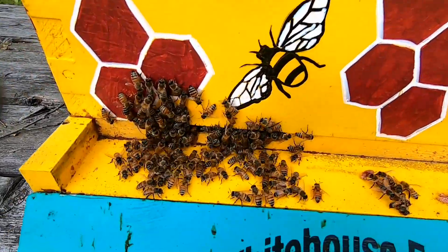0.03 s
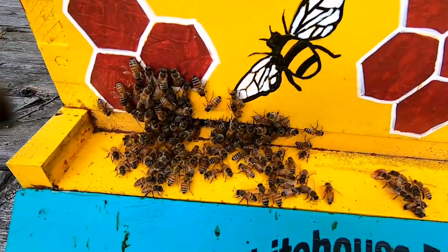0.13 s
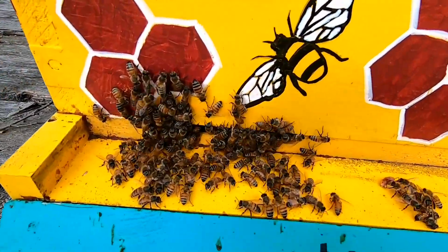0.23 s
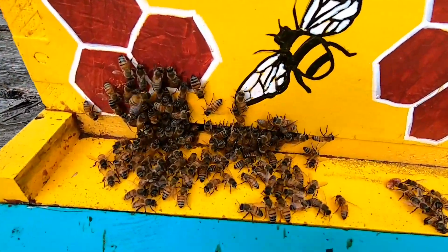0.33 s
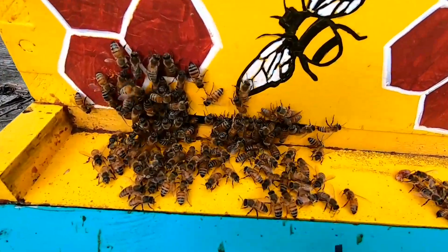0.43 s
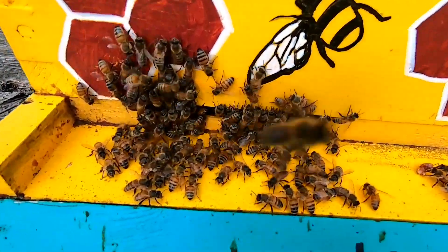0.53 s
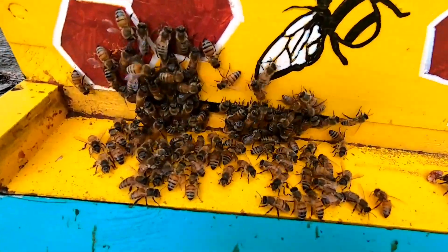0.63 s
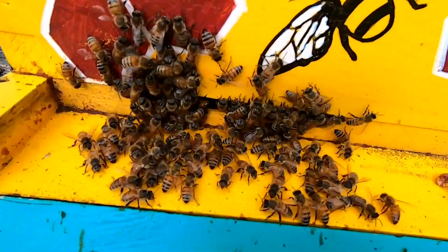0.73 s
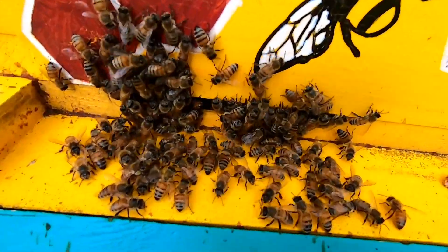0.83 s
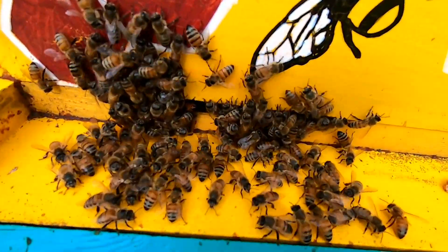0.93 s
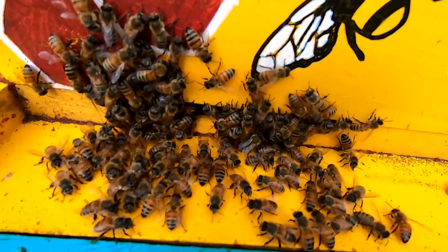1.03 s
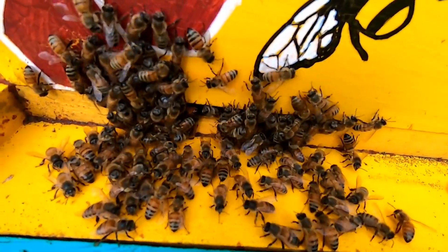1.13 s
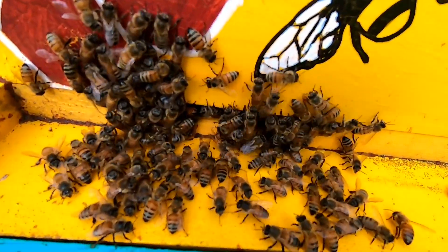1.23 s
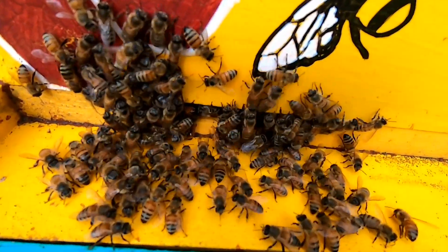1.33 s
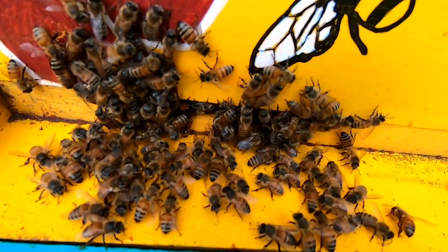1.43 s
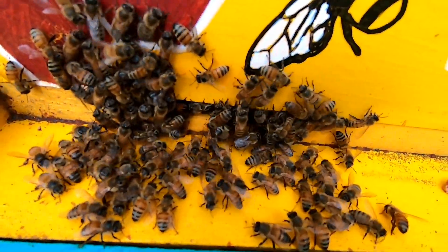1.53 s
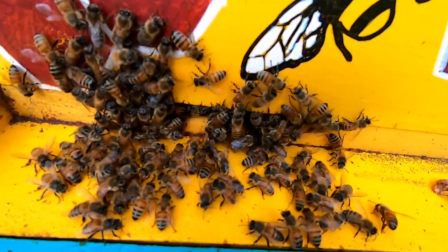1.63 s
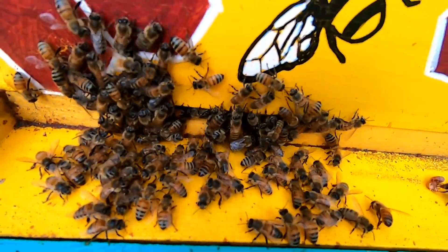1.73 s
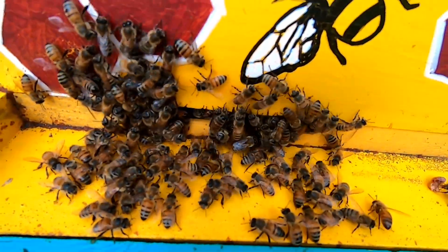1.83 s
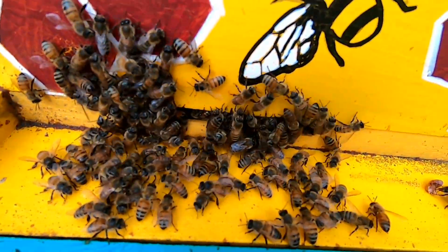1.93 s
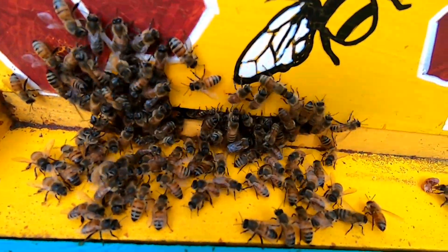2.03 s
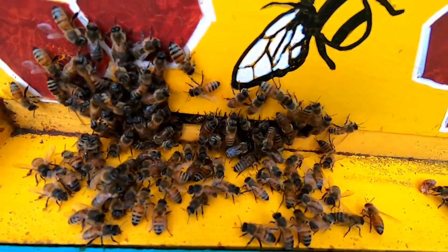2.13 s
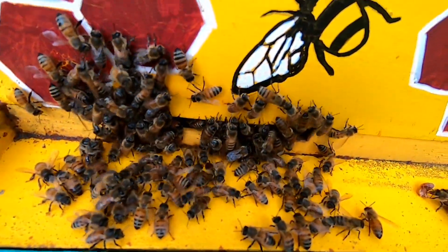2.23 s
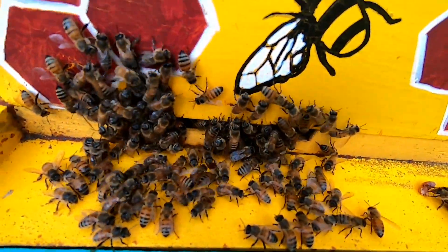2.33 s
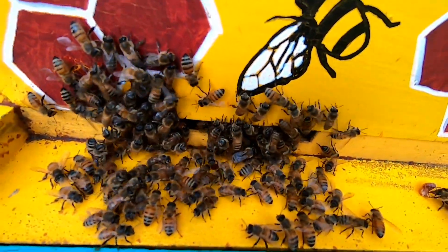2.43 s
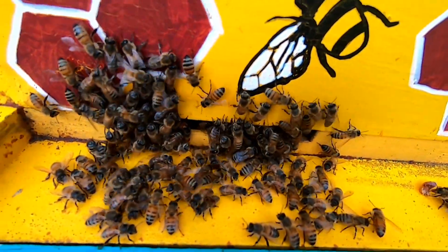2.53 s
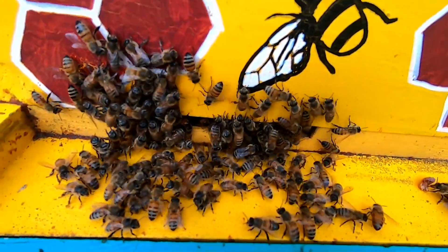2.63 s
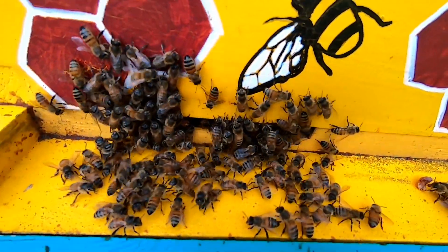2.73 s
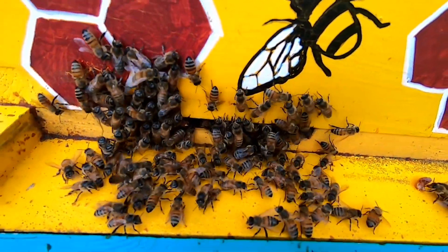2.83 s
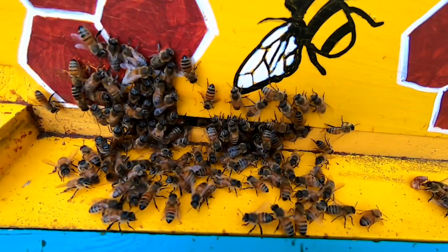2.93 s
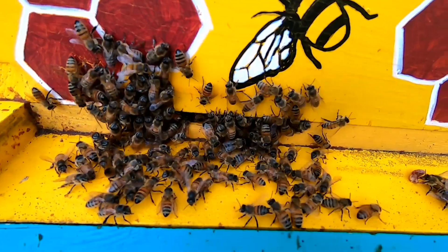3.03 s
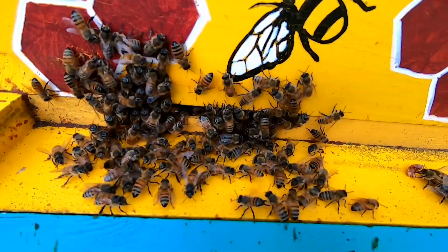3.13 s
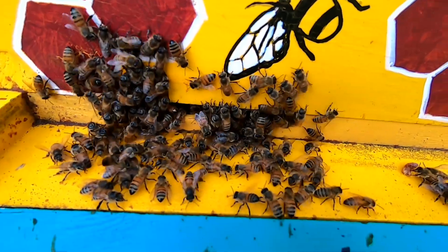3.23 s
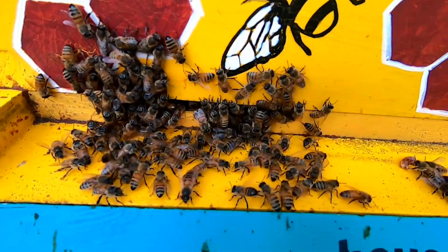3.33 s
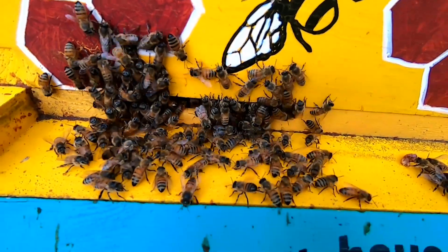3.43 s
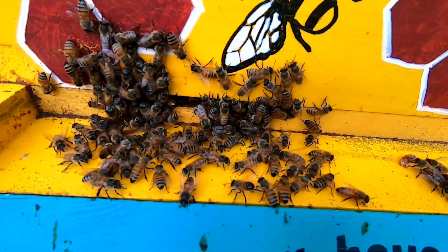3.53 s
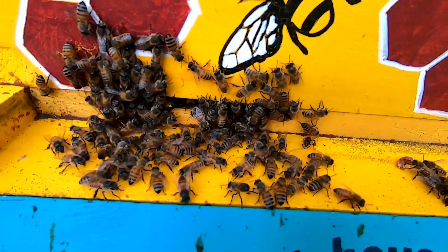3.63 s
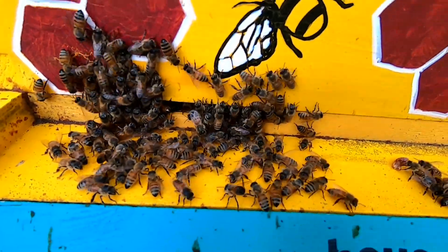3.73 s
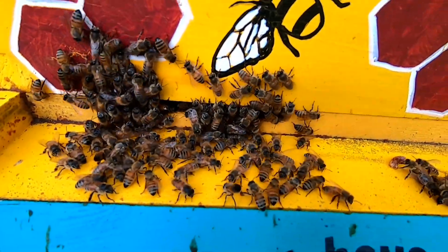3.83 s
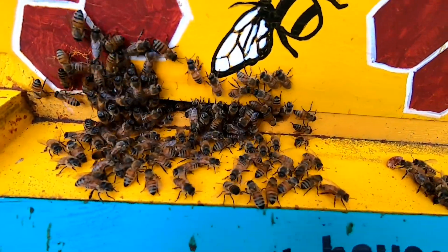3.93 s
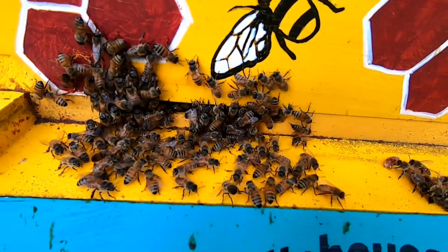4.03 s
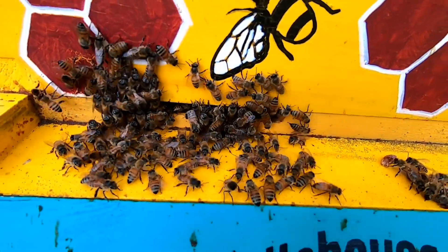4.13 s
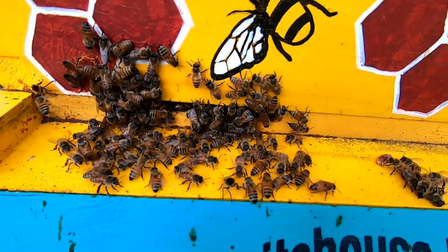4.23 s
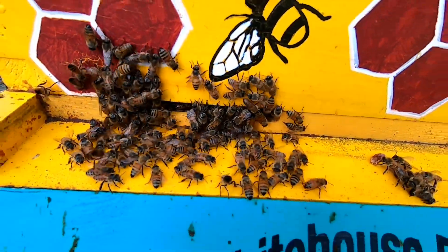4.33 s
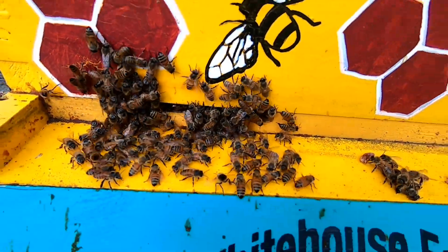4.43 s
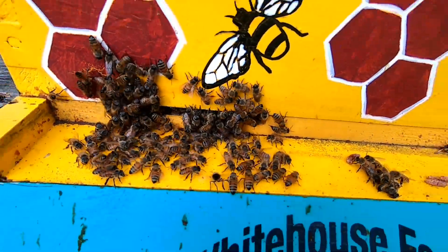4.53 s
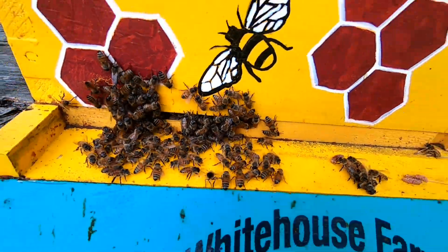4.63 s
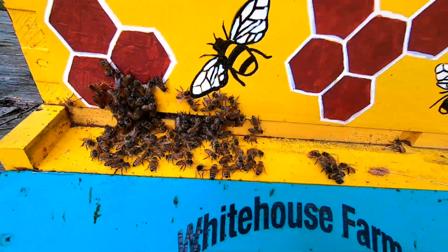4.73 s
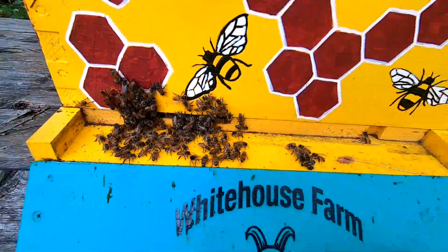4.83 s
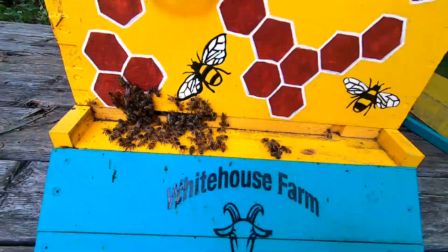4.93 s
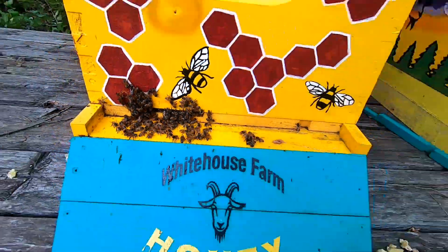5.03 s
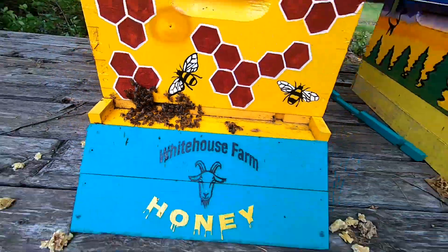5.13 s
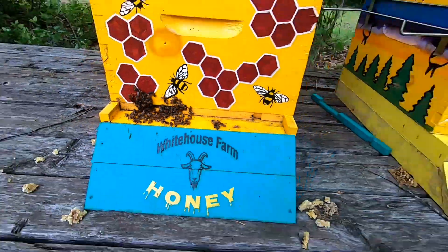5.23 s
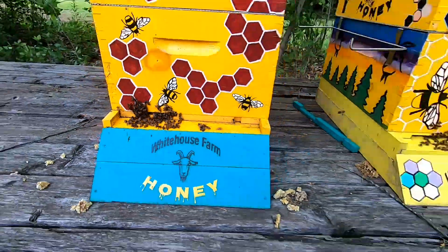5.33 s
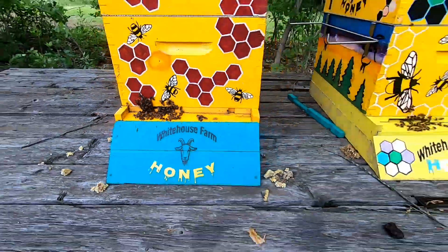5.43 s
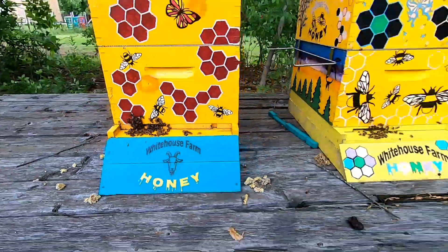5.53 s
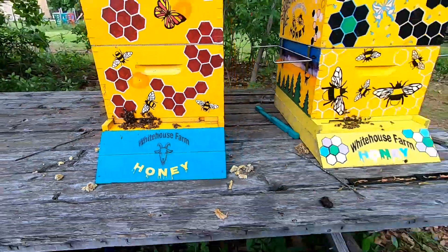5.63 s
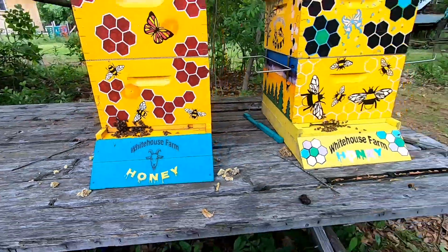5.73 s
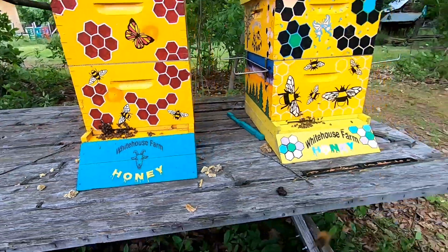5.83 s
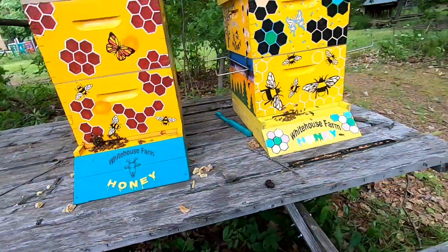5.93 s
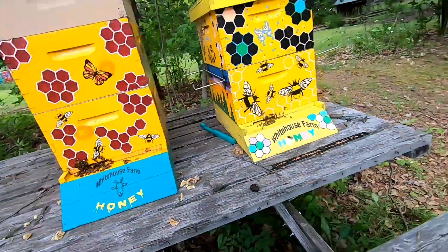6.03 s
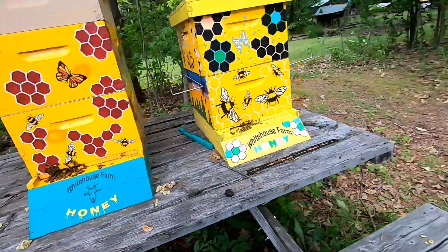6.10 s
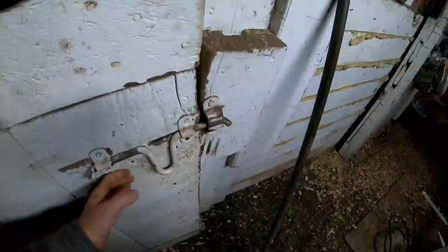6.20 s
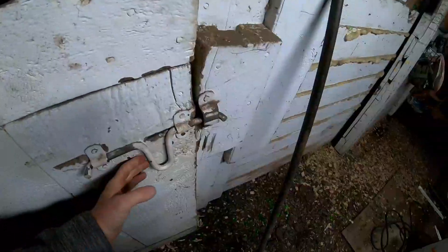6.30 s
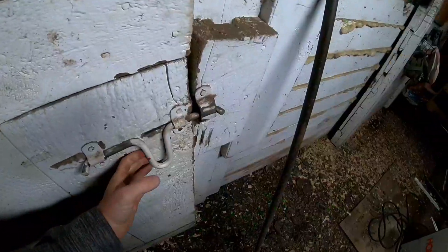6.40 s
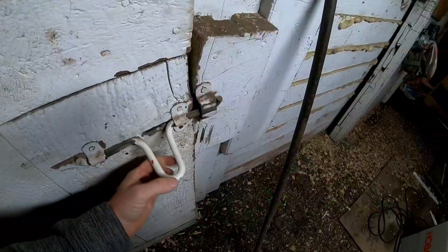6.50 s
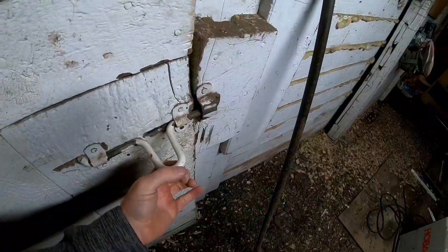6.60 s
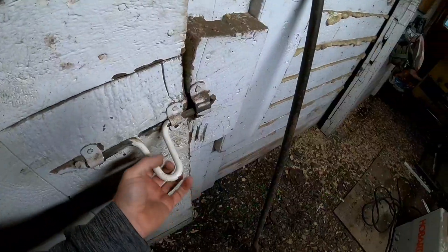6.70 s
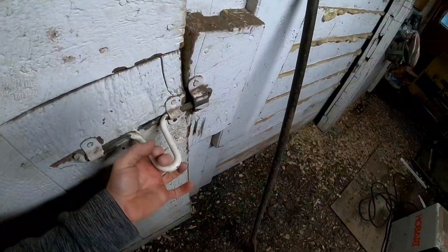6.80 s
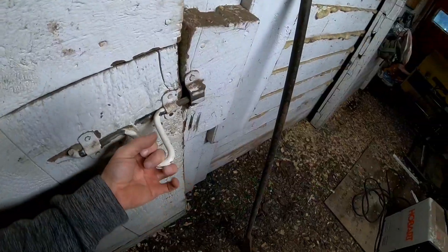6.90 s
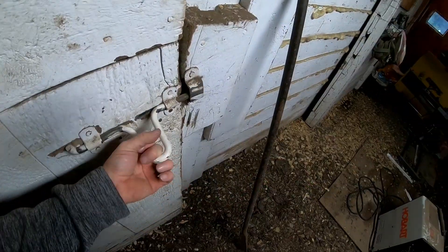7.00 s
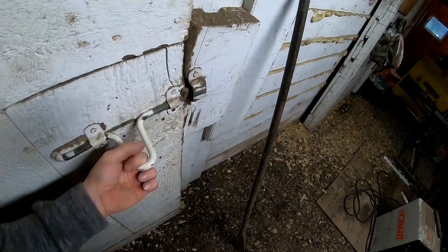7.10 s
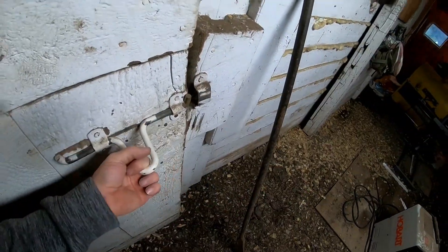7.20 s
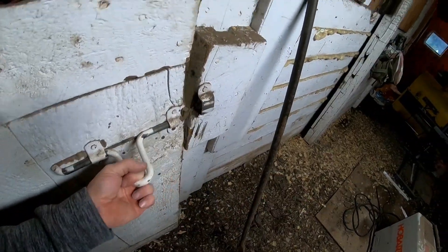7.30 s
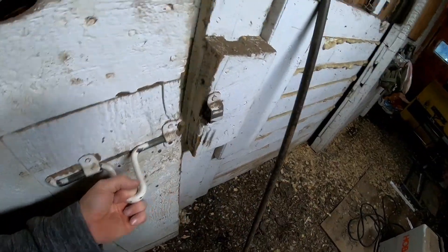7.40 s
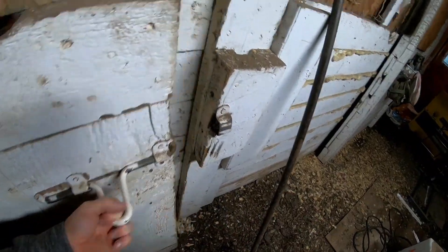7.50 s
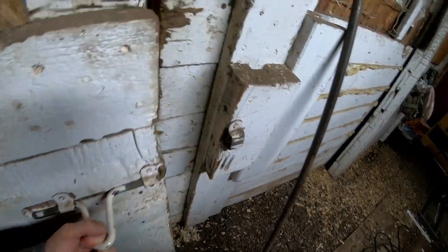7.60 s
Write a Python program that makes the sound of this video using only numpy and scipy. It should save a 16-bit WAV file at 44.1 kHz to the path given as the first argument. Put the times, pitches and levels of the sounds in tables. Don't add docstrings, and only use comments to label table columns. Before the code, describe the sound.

Outdoors at a hive, a faint swarm hums while single bees buzz past a small camera microphone. Light wind flutters on it, growing stronger, and bees hit the housing with soft thuds and ticks. The sound briefly turns wide and hissy, then calms. After a tiny silence, a close iron bolt in a barn rattles, chirps and clacks sharply, and a wooden door creaks and rumbles.

```python
import sys
import numpy as np
from scipy import signal
from scipy.fft import rfft, irfft, next_fast_len
from scipy.io import wavfile
from scipy.ndimage import uniform_filter1d, minimum_filter1d

SR = 44100
rng = np.random.default_rng(int(sys.argv[2]) if len(sys.argv) > 2 else 0)


def elevation(decibels):
    levels = np.asarray(decibels, float)
    return 10 ** (levels / 20)


def inscribe(sig):
    pcm = np.round(np.clip(np.atleast_2d(sig).T, -1, 1) * 32767)
    wavfile.write(sys.argv[1], SR, pcm.astype(np.int16))


N = 337805
T = np.arange(N) / SR
CUT_S = 6.197
# f/Hz, level/dB, t60/s
BOLT_MODES = [(3170, -37, 0.27), (3540, -41, 0.2), (4580, -17, 0.19), (4700, -29, 0.19), (4860, -27, 0.24),
              (5300, -4.5, 0.044), (5400, -35, 0.18), (6030, -20, 0.15), (6164, -30, 0.16),
              (6300, -41, 0.54), (6400, -36, 0.24), (7795, -27.5, 0.19), (8240, -20, 0.18)]
# f/Hz, level/dB, t60/s
BOARD_MODES = [(107.7, -13.5, 5.0), (255, -14.5, 0.17), (653, -9.5, 0.12), (815, -1, 0.067),
               (860, -22, 0.45), (1030, -4.5, 0.11), (1207, -21, 0.35), (1310, -15.5, 0.18),
               (1430, -15.5, 0.14)]


def curve(table):
    s, *columns = np.transpose(table)
    return [np.interp(T, s, c) for c in columns]


def swell(s, db, rise_s, fall_s, t=T, power=1):
    return db - 20 * np.where(t < s, (s - t) / rise_s, (t - s) / fall_s) ** power


def unit(x):
    return x / np.sqrt(np.mean(x ** 2))


def even(x, size):
    return x / np.sqrt(uniform_filter1d(x ** 2, size=size) + 1e-12)


def colour(x, points, turn=0):
    size = next_fast_len(N + 4096)
    hz = np.arange(size // 2 + 1) * SR / size + 1
    points_hz, points_db = np.transpose(points)
    db = np.interp(np.log(hz), np.log(points_hz), points_db)
    spectrum = rfft(np.pad(x, (0, size - N), "reflect"))
    return irfft(spectrum * elevation(db) * np.exp(1j * turn * hz), size)[:N]


def band(x, lo_hz, hi_hz, order=2):
    return signal.sosfilt(signal.butter(order, [lo_hz, hi_hz], "band", fs=SR, output="sos"), x)


def noise(size=N):
    return rng.standard_normal(size)


def walk(rate, size=N):
    k = int(SR / rate / 16)
    held = np.repeat(noise(size // 16 // k + 2), k)
    slow = uniform_filter1d(uniform_filter1d(held, k), k)
    return 1.3 * np.interp(np.arange(size) / 16, np.arange(len(slow)), slow)


def wings(hz, first_db, second_db, fall_db, wobble_db, rough, count=12):
    n = len(hz)
    phase = 2 * np.pi * np.cumsum(hz * (1 + rough / 20 * walk(90, n))) / SR
    out = elevation(first_db + wobble_db * walk(25, n) / 2) * np.cos(phase)
    for k in range(2, count):
        drift = 2 * rough * np.sqrt(k) * walk(35, n)
        db = second_db - fall_db * np.log2(k / 2) - 1.6 * max(k - 5, 0)
        db = db + 1.5 * (k == 5) - 3.0 * (k == 4) + wobble_db * walk(30, n)
        out = out + elevation(db) * np.cos(k * phase + drift + .35 * k * k)
    eddies = unit(band(noise(n), 250, 1300, order=3)) * (1 + np.cos(phase))
    return np.sqrt(2) * out * elevation(6 * rough * walk(120, n)) + elevation(second_db - 8.5) * eddies


def swarm():
    out = np.zeros(N)
    for hz in (212, 231, 247, 266):
        far_db = -70 + 3 * walk(5)
        far_db = far_db - 13 * np.clip((T - 4.6) / .4, 0, 1)
        out = out + wings(hz * (1 + .055 * walk(5)), far_db, far_db - 3, 15, 4.0, .4, count=5)
    return out


def add_pass(out, s, hz, db, rise_s, fall_s, fall_db, count):
    near_from_db, near_gain = -66, .8
    beat_sag = .004
    near = np.arange(SR // 2) + max(int(s * SR) - SR // 4, 0)
    level_db = swell(s, db, rise_s, fall_s, T[near], power=1.5)
    first_db = level_db + near_gain * np.clip(level_db - near_from_db, 0, 19)
    beat_hz = hz * (1 + beat_sag * np.clip(db - level_db, 0, 30) * (T[near] < s))
    out[near] += wings(beat_hz, first_db, level_db, fall_db, 3.5, .36, count=count)


def passing_bees():
    # closest t/s, wing beat f/Hz, level/dB, approach/s, retreat/s (per 20 dB)
    passes = [(0.14, 262, -61, .25, .15), (0.25, 248, -62, .1, .12), (0.64, 231, -58, .1, .16),
              (0.79, 236, -62, .08, .1), (1.28, 256, -56, .13, .09), (2.03, 258, -61, .15, .08),
              (3.18, 218, -50.5, .05, .08), (3.27, 229, -55, .1, .12), (4.08, 240, -52, .12, .04),
              (4.38, 226, -56, .2, .15), (4.55, 228, -52, .08, .1)]
    # closest t/s, wing beat f/Hz, level/dB, approach/s, retreat/s
    edge_on = [
        (0.64, 231, -68, .1, .14),
        (0.79, 236, -70, .08, .08),
    ]
    out = np.zeros(N)
    for s, hz, db, rise_s, fall_s in passes:
        fall_db = 9 + .5 * min(db + 66, 15)
        add_pass(out, s, hz, db, rise_s, fall_s, fall_db, count=12)
    for row in edge_on:
        add_pass(out, *row, fall_db=0, count=8)
    return out


def wind():
    # t/s, buffeting level/dB, length/s per 20 dB, flutter above it/dB
    gusts = [(0.0, -44, .3, 0), (0.07, -46, .2, 2), (0.13, -44, .1, 5), (0.255, -42, .12, 3),
             (0.31, -48, .15, 0), (0.37, -50, .06, 2), (0.5, -48, .12, 4), (0.72, -49, .1, 9),
             (0.8, -48, .12, 8), (0.88, -49, .15, 3), (0.93, -48, .1, -2), (1.0, -53, .08, 5),
             (1.1, -53, .12, 5), (1.28, -52, .15, -8), (1.467, -37, .035, 0), (1.66, -55, .06, 0),
             (1.88, -49, .12, 2), (1.95, -49, .15, -2), (2.02, -42, .12, -3), (2.17, -48, .12, 8),
             (2.29, -46, .12, -4), (2.415, -43, .1, 1), (2.56, -46, .1, 11), (2.66, -56, .1, 8),
             (2.81, -56, .15, 4), (2.94, -52, .15, -8), (3.08, -55, .08, 4), (3.19, -41, .12, -2),
             (3.27, -46, .15, -8), (3.56, -32, .1, -2), (3.73, -35, .12, -4), (3.91, -37, .1, -10),
             (4.0, -41, .15, -6), (4.155, -35, .07, 4), (4.3, -32, .15, -2), (4.41, -29, .1, 7),
             (4.6, -29, .1, -1), (4.8, -38, .3, 4), (5.05, -42, .3, -6), (5.36, -45, .25, -15),
             (5.64, -44, .1, -6), (5.78, -47, .15, 0), (5.92, -43, .12, 5)]
    low_db, flutter_db = np.full(N, -62), np.full(N, -54)
    for s, db, length_s, rel_db in gusts:
        eddy_db = swell(s, db, length_s, length_s)
        low_db = np.maximum(low_db, eddy_db)
        flutter_db = np.maximum(flutter_db, eddy_db + rel_db)
    burst = 0.8 * walk(16) + 0.85 * walk(40)
    low = even(band(noise(), 27.6, 105.7), size=SR // 10)
    flutter = even(band(noise(), 125, 225), size=SR // 14)
    return low * elevation(low_db + 1.5 + 1.2 * burst) + flutter * elevation(flutter_db - 4.0 + 1.8 * burst)


def striking_bees():
    # t/s, wing beat f/Hz, level/dB, first partial above it/dB
    flights = [
        [(1.375, 240, -63, 5), (1.404, 228, -50, 13), (1.446, 210, -50, 12), (1.458, 229, -44, -4),
         (1.472, 242, -40, -1), (1.505, 240, -58, -2), (1.53, 242, -70, 5)],
        [(4.57, 228, -52, 2), (4.62, 218, -38, 6), (4.655, 217, -37, 12), (4.685, 223, -36, 12),
         (4.72, 224, -40, 12), (4.74, 223, -52, 9)],
        [(4.712, 236, -38, 6), (4.74, 229, -38, 0), (4.765, 238, -36, -2), (4.806, 238, -40, -3),
         (4.822, 230, -43, 10), (4.858, 223, -47, 11), (4.908, 240, -55, 9), (4.98, 226, -70, 10)],
    ]
    out = np.zeros(N)
    for leg in flights:
        start_s, end_s = leg[0][0], leg[-1][0]
        near = np.arange(SR // 3) + int(start_s * SR)
        aloft = np.clip(np.minimum(T - start_s, end_s - T) / 0.006, 0, 1)
        hz, level_db, rel_db = (c[near] for c in curve(leg))
        out[near] += aloft[near] * wings(hz, level_db + rel_db, level_db, 8.5 + .15 * rel_db, 2.5, .38)
    return out


def bumps():
    # t/s, peak level/dB, ring f/Hz, t60/s, tick level/dB
    blows = [(1.4603, -20.5, 520, 0.023, -41), (1.4606, -28, 150, 0.06, -30),
             (1.4718, -23.5, 190, 0.035, -44), (2.007, -47, 500, .015, -26), (2.636, -48, 375, 0.025, -24),
             (2.781, -44, 424, .02, -26), (4.138, -19, 475, 0.015, -29), (4.291, -29.5, 369.4, 0.017, -11),
             (4.616, -15.5, 200.2, 0.02, -28), (4.715, -20.5, 780, 0.011, -17.5),
             (4.752, -35, 900, .012, -19), (4.818, -24, 300, .019, -23), (5.615, -42.5, 300, 0.023, -20),
             (5.908, -46, 317, 0.028, -25), (5.975, -40, 290, 0.023, -21)]
    # t/s, level/dB, from f/Hz, to f/Hz
    flicks = [
        (4.291, -27, 3000, 3900),
        (4.7195, -39, 2500, 14000),
        (4.7265, -44, 4000, 15000),
        (1.4605, -29, 500, 1700),
        (1.471, -36, 1000, 3200),
        (4.7145, -20, 600, 2100),
        (4.752, -29, 900, 2000),
        (6.16, -56, 10000, 15000),
        (1.465, -42, 1500, 3200),
    ]
    out = np.zeros(N)
    t = T[:SR // 10]
    for s, db, hz, t60, tick_db in blows:
        i = int(s * SR)
        thud = np.sin(2 * np.pi * hz * t) * np.exp(-np.log(1000) * t / t60) * (1 - np.exp(-t / 0.00023))
        push = 0.41 * np.sin(2 * np.pi * 110 * t) * np.exp(-t / 0.013)
        tick = elevation(tick_db) * band(noise(len(t)) * np.exp(-t / 0.0018), 600, 4300, order=1)
        out[i:i + len(t)] += elevation(db + 1.5) * (thud + push + tick)
    for s, db, lo_hz, hi_hz in flicks:
        i = int(s * SR)
        out[i:i + len(t)] += elevation(db) * band(noise(len(t)) * np.exp(-t / .0025), lo_hz, hi_hz, order=3)
    return out


def hive_air():
    # f/Hz, level/dB per Hz
    spectrum = [(150, -19), (250, -11), (282, -4.5), (490, -10.5), (1160, -18.5), (1310, -16.5),
                (3160, -16), (7250, -25), (11200, -35), (12400, -56.5), (15500, -51.5)]
    lift = np.clip(np.minimum((T - 2.3) / .9, (5.05 - T) / .4), 0, 1)
    return unit(colour(noise(), spectrum)) * elevation(-57.9 + 3.9 * lift + 0.7 * walk(3.57))


def port_whine():
    db = -74 + walk(2) + 4 * np.exp(-((T - 2.8) / .5) ** 2) + .3 * (T > 5)
    return unit(band(noise(), 11600, 14200)) * elevation(db)


def hive():
    # t/s, hiss level/dB
    opening = [
        (2.7, -73),
        (2.93, -58),
        (3.17, -53.5),
        (3.49, -50.5),
        (3.97, -49.5),
        (4.58, -47.5),
        (5.0, -57.5),
        (5.37, -64.5),
        (5.75, -70),
    ]
    # f/Hz, level/dB per Hz
    hiss_spectrum = [(150, 2.5), (450, 11), (1000, 2), (2000, 1), (3200, -1.5), (3900, -5), (4600, -1.5),
                     (6500, 0), (7800, 4), (8600, -1.5), (9500, -12.5), (12500, -22), (14200, -30),
                     (15500, -41)]
    # f/Hz, level/dB
    left_lift = [(60, 2.5), (200, -2), (450, 7), (1000, 8.5), (2000, -1.5), (4000, -18), (8000, 7),
                 (15000, -12)]
    # f/Hz, level/dB
    right_tone = [(60, -15), (200, -6.5), (450, -6), (1000, 0), (3300, -0.5), (4000, -4), (4600, -18.5),
                  (5000, -26), (5300, -71)]
    turn = -2 * np.pi * .000095
    wide_db, = curve(opening)
    wide = np.clip(elevation(wide_db - wide_db.max()) * 0.9 - .08, 0, 1)
    wide = wide * (T > opening[0][0]) * (T < opening[-1][0])
    opened = wide ** 0.37
    near = swarm() + passing_bees() + wind() + striking_bees() + bumps()
    left = near + opened * colour(near, left_lift)
    hiss, other = (unit(colour(noise(), hiss_spectrum)) * wide * elevation(-35.5) for _ in range(2))
    right = (1 - opened) * near - opened * colour(left, right_tone, turn)
    right = right - colour(hiss + 0.15 * other, right_tone, turn)
    right = right + opened * elevation(-50.5 + 4.8 * walk(8.7)) * unit(band(noise(), 30, 130))
    return np.array([left + hiss + port_whine(), right]) + hive_air()


def ring(x, modes, damp):
    i = int(CUT_S * SR)
    out = np.zeros(N)
    for hz, db, t60 in modes:
        decay = np.log(1000) / min(t60 * damp, .4)
        pole = np.exp((2j * np.pi * hz - decay) / SR)
        out[i:] += elevation(db) * signal.lfilter([1], [1, -pole], x[i:]).imag
    return out


def door_levels():
    # t/s, level/dB
    pull = [
        (6.3, -63),
        (6.5, -62),
        (6.585, -39),
        (6.7, -34),
        (6.916, -45),
        (7.09, -46),
        (7.22, -31),
        (7.4, -36),
        (7.65, -27),
    ]
    # t/s, boards level/dB, grit level/dB, build/s, decay/s (per 20 dB)
    shoves = [
        (6.644, -21, -26, .02, .11),
        (6.74, -30, -45, .03, .1),
        (6.941, -18, -46, .005, .07),
        (7.162, -16, -25, .05, .07),
        (7.13, -30, -27, .06, .05),
        (7.24, -32, -36, .04, .04),
        (7.34, -28, -35, .12, .04),
        (6.795, -38, -52, .04, .06),
    ]
    free = np.clip((T - 7.15) / .05, 0, 1)
    strain_db, = curve(pull)
    shove_db = np.max([swell(s, db, rise_s, fall_s) for s, db, _, rise_s, fall_s in shoves], axis=0)
    grit_db = np.max([swell(s, db, rise_s * .8, fall_s * .7) for s, _, db, rise_s, fall_s in shoves], axis=0)
    rumble_db = np.maximum(strain_db - 2.5 + 4 * free, shove_db - 6.5)
    boards_db = np.maximum(strain_db, shove_db)
    scrape_db = np.maximum(.4 * strain_db - 38, grit_db)
    scrape_db = minimum_filter1d(scrape_db, size=SR // 80, origin=SR // 160 - 1)
    sway_db = np.maximum(strain_db - 12 + 15 * free, -60)
    return rumble_db, boards_db, scrape_db, sway_db


def door_rumble(db):
    return elevation(db - 1.5) * even(band(noise(), 135, 330), size=SR // 8)


def knocks():
    # t/s, peak level/dB, share in the boards/dB, bright centre f/Hz, share in the iron/dB
    hits = [(6.4293, -48.5, 3, 3500, 0), (6.5887, -41, 0, 2100, -20), (6.638, -24, -6, 1700, -15),
            (6.6418, -6, -13, 5200, -8), (6.734, -26, -4, 1700, -18), (6.7405, -15, -18, 2050, -28),
            (6.7764, -34, 9, 1930, -12), (6.8028, -34, -2, 5700, -2), (6.8754, -36, 1, 1890, -13),
            (6.9355, -18, -7, 4850, -6), (6.944, -17, -4, 1400, -13), (6.991, -33, -12, 4400, -4),
            (7.0515, -40, -4.5, 4500, -13), (7.0712, -37, -6, 3600, -8), (7.1387, -14, -6, 3850, 0),
            (7.1514, -20, 0, 2560, -3), (7.1648, -11, -3, 5170, -2), (7.223, -31, 7.5, 4510, -23),
            (7.2494, -27, -3, 1880, -9), (7.2951, -23, -7, 4600, -12), (7.441, -36, 1, 4200, -12),
            (7.6032, -41, 12.5, 2380, -6), (7.628, -45.5, 10, 2020, -2), (7.141, -17, -16, 5400, -6),
            (7.1395, -17, -17, 1770, -20), (6.7928, -38, 3, 1600, -15), (7.4059, -40, 0, 5000, -12),
            (6.9395, -21, -3, 5200, -10)]
    iron, wood, crack = np.zeros((3, N))
    t = T[:SR // 20]
    onset = 1 - np.exp(-t / .0006)
    for s, db, rel_db, hz, iron_db in hits:
        i = int(s * SR)
        n = len(crack[i:i + len(t)])
        chance = noise(len(t))
        chatter = chance * np.exp(-t / 0.0032)
        snap = band(chance, hz / 1.45, hz * 1.25) * np.exp(-t / 0.0049) * onset
        clang = np.sin(2 * np.pi * hz * t) * elevation(-60 * t / .016) * onset
        slap = band(chance[::-1], 400, 1750) * np.exp(-t / 0.0093)
        touch = np.diff(chance, prepend=0) * np.exp(-t / .002)
        iron[i:i + n] += elevation(db + iron_db - 11.5) * chatter[:n]
        wood[i:i + 60] += elevation(db + rel_db) * np.hanning(60) / 30
        crack[i:i + n] += elevation(db) * snap[:n] + elevation(db - 9) * clang[:n]
        crack[i:i + n] += elevation(db + rel_db + 1) * slap[:n] + elevation(db + iron_db - 12) * touch[:n]
    ringing = elevation(-7.5) * ring(iron, BOLT_MODES, 0.22) + elevation(-0.5) * ring(wood, BOARD_MODES, 0.36)
    return ringing + elevation(2.5) * crack, crack


def stick_slip():
    clicks = (rng.random(N) < 9000 / SR) * noise()
    return unit(clicks * elevation(1.14 * rng.exponential(1, N)))


def bolt_scrape(grit, db):
    scrape = 0.12 * unit(ring(grit, BOLT_MODES, 0.2)) + 1.16 * unit(band(grit, 1400, 8800, order=4))
    return elevation(db - 5.5) * scrape


def board_scrape(grit, db):
    return elevation(db - 15.5) * unit(band(ring(grit, BOARD_MODES, .15), 265, 2400))


def bolt_song(grit):
    # f/Hz, level/dB, t60/s
    song_modes = [(5420, 4, 0.021), (6350, -12, .03), (7600, -14, 0.026)]
    # t/s, level/dB, build/s, decay/s (per 20 dB)
    squeals = [
        (6.58, -52, .07, .06),
        (6.641, -22, .008, .006),
        (6.65, -47, .01, .09),
        (6.806, -50, .004, .02),
    ]
    # t/s, level/dB, build/s, decay/s (per 20 dB), f/Hz
    whistles = [(6.634, -27, .02, .01, 5420), (6.634, -34, .02, .012, 6350), (6.634, -40, .02, .012, 7650),
                (6.808, -43, .005, .03, 5400), (6.655, -58, .01, .07, 10800), (6.752, -50, .01, .02, 5400),
                (7.227, -43, .015, .02, 1750), (6.885, -42, .015, .02, 1000), (6.812, -52, .01, .03, 6700),
                (6.925, -52, .04, .02, 4900), (6.932, -42, .015, .01, 6300), (7.08, -50, .01, .02, 1750),
                (7.094, -50, .012, .012, 7600), (7.25, -47, .02, .02, 10300), (7.283, -42, .015, .03, 8300),
                (7.285, -40, .02, .03, 9100)]
    width = .018
    sing_db = np.max([swell(*row) for row in squeals], axis=0) - 8
    sing = unit(ring(grit, song_modes, 0.75)) * elevation(sing_db)
    for *row, hz in whistles:
        near = slice(int((row[0] - .1) * SR), int((row[0] + .1) * SR))
        air = unit(band(noise(SR // 4), hz * (1 - width), hz * (1 + width)))
        sing[near] += elevation(swell(*row, T[near])) * air[:len(T[near])]
    return sing


def door_sway(db):
    # t/s, level/dB, build/s, decay/s (per 20 dB), f/Hz
    swings = [
        (6.595, -35, .02, .05, 200),
        (6.65, -19, .012, .035, 185),
        (6.7, -35, .06, .13, 105),
        (7.172, -18, .015, .05, 165),
        (7.215, -19, .07, .1, 107),
        (6.882, -33, .02, .05, 210),
        (6.955, -27, .03, .04, 200),
        (7.19, -24, .015, .02, 340),
    ]
    sway = unit(band(noise(), 45, 138)) * elevation(db - 2.5)
    for *row, hz in swings:
        sway = sway + elevation(swell(*row)) * np.sin(2 * np.pi * np.cumsum(hz * (1 + .06 * walk(40))) / SR)
    return sway


def door_creak():
    # t/s, slip rate f/Hz, level/dB
    slips = [
        (7.295, 415.6, -30),
        (7.31, 410.3, -39.5),
        (7.35, 414, -26),
        (7.365, 406, -64),
    ]
    slip_hz, creak_db = curve(slips)
    saw = signal.sawtooth(2 * np.pi * np.cumsum(slip_hz * (1 + .035 * walk(150))) / SR)
    return band(saw, 760, 1500) * elevation(creak_db + 9) * (T > slips[0][0]) * (T < slips[-1][0])


def door_squeak():
    # t/s, f/Hz, level/dB
    glide = [
        (7.553, 4050, -58),
        (7.562, 3900, -41),
        (7.572, 3800, -42),
        (7.595, 3720, -57),
    ]
    squeak_hz, squeak_db = curve(glide)
    tone = np.sin(2 * np.pi * np.cumsum(squeak_hz * (1 + .04 * walk(350))) / SR)
    return tone * elevation(squeak_db + 3.8 * walk(300)) * (T > glide[0][0]) * (T < glide[-1][0])


def barn():
    # f/Hz, level/dB per Hz
    barn_air = [(18, -33), (30, 12.5), (113, -25), (157, -6), (341, -22.5), (1110, -29.5), (1620, -35),
                (2020, -27), (4400, -30), (12000, -59), (15600, -103), (22000, -120)]
    rumble_db, boards_db, scrape_db, sway_db = door_levels()
    struck, crack = knocks()
    grit = stick_slip()
    close = struck + bolt_song(grit) + door_creak()
    tail = noise(SR // 2) * elevation(-60 * T[:SR // 2] / 0.21)
    close = close + elevation(-34.5) * signal.fftconvolve(close, tail)[:N]
    door = door_rumble(rumble_db) + board_scrape(grit, boards_db) + door_sway(sway_db) + door_squeak()
    mix = close + bolt_scrape(grit, scrape_db) + door + elevation(-50) * unit(colour(noise(), barn_air))
    mix = colour(mix, [(30, -6), (100, 1.5), (6000, -1), (7500, -11.5), (9500, -20), (12000, -32), (15500, -38)])
    side = colour(crack, [(1500, -40), (4000, -27), (8000, -19), (12000, -38)])
    return np.array([mix + side, mix - side])


def scene():
    back_s, fade_s = 6.262, 0.063
    fade_out = np.clip((CUT_S - T) / 0.0028, 0, 1)
    fade_in = np.clip((T - back_s) / fade_s, 0, 1) ** 3
    return hive() * fade_out + barn() * fade_in


def roll_off(x):
    return signal.sosfilt(signal.butter(12, 15490, fs=SR, output="sos"), x)


def record(dry):
    mix = dry * np.clip((T[-1] - T) / .004, 0, 1)
    return roll_off(mix)


dry = scene()
out = record(dry)
inscribe(out)
```